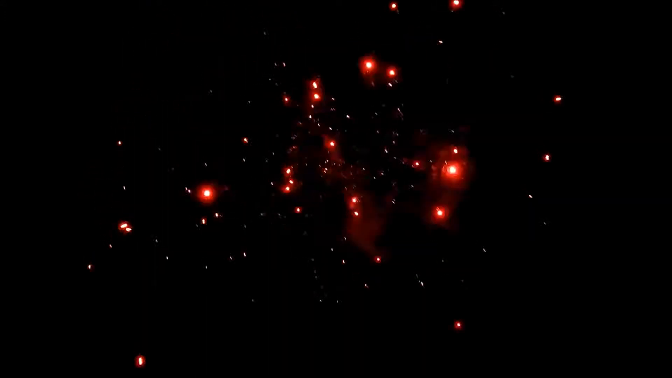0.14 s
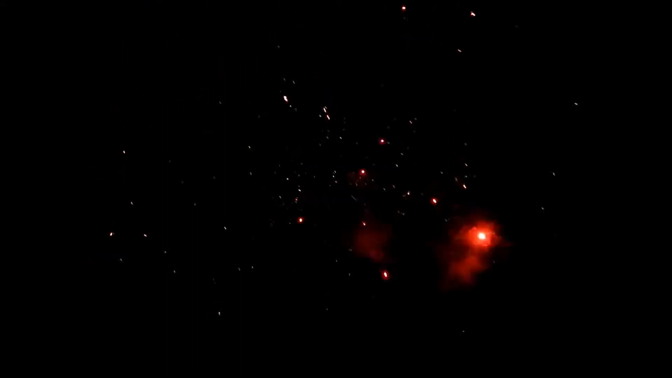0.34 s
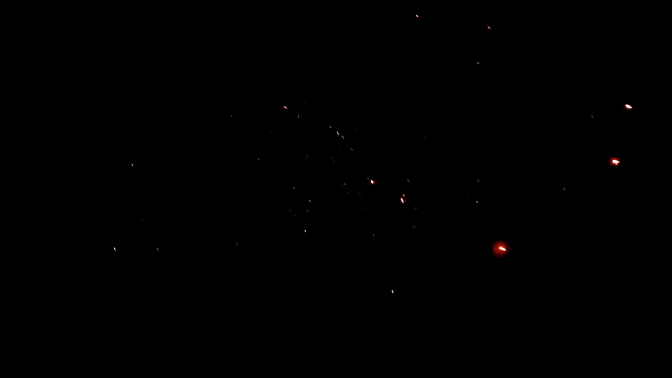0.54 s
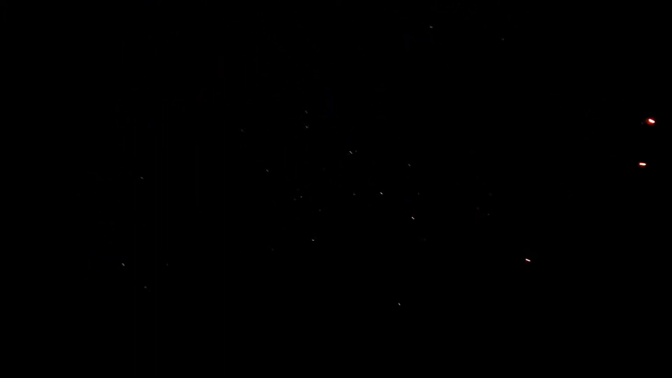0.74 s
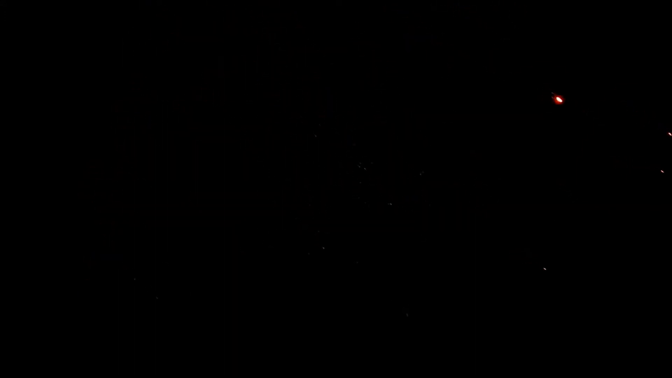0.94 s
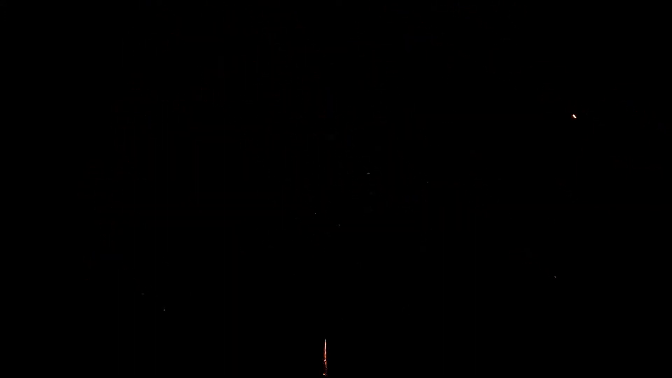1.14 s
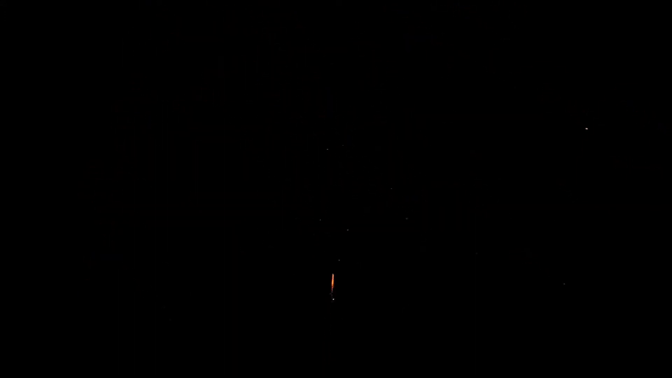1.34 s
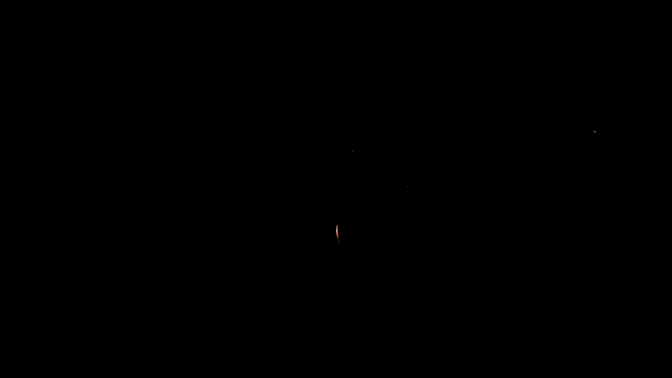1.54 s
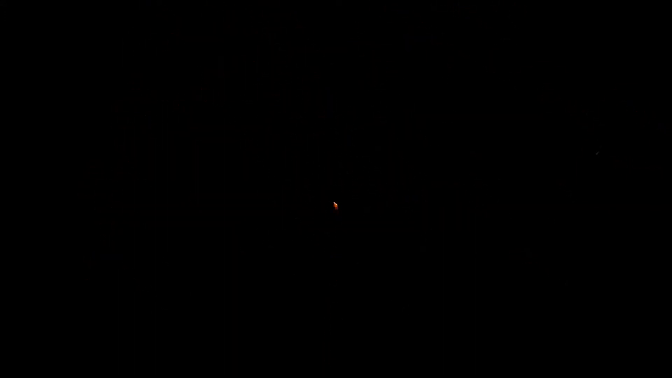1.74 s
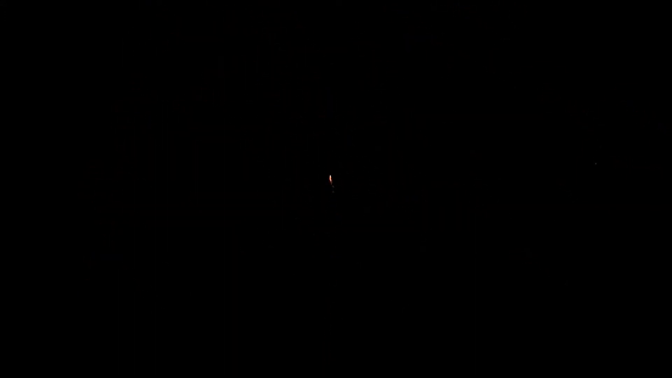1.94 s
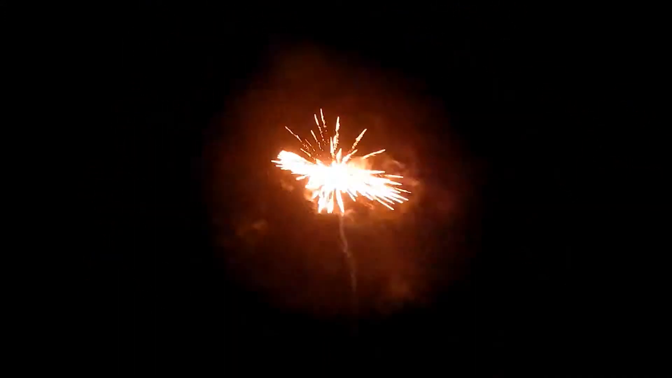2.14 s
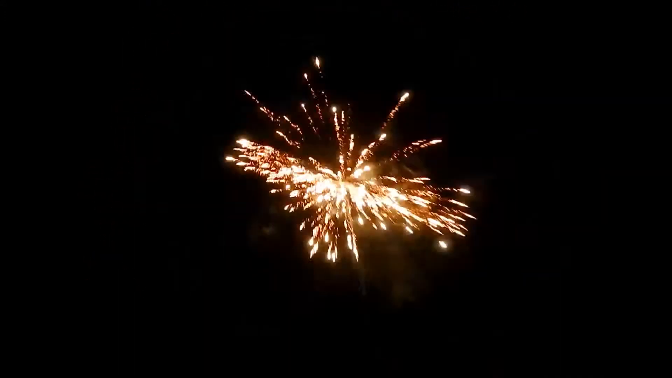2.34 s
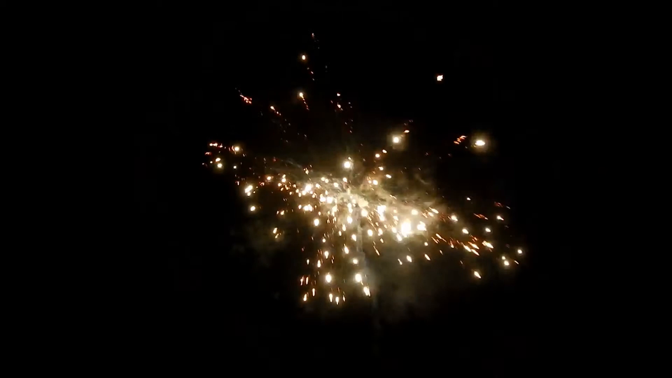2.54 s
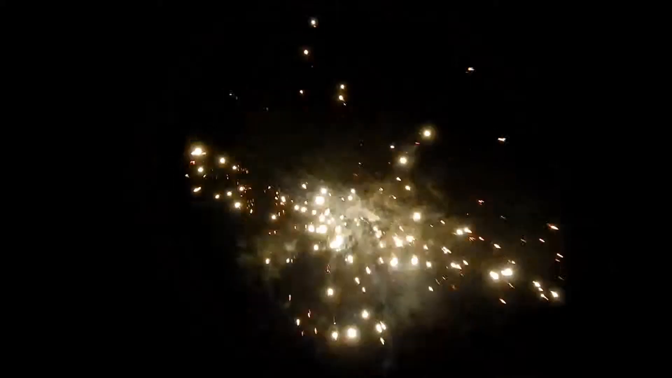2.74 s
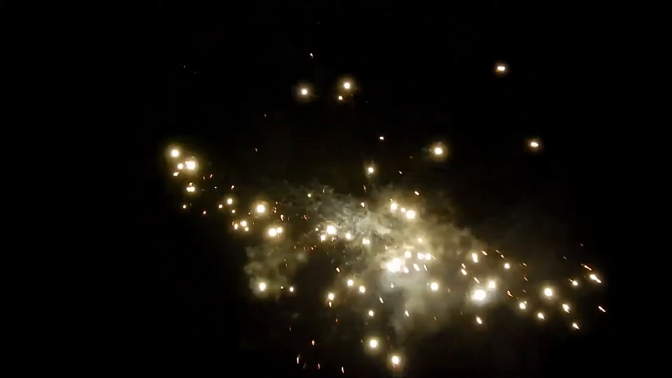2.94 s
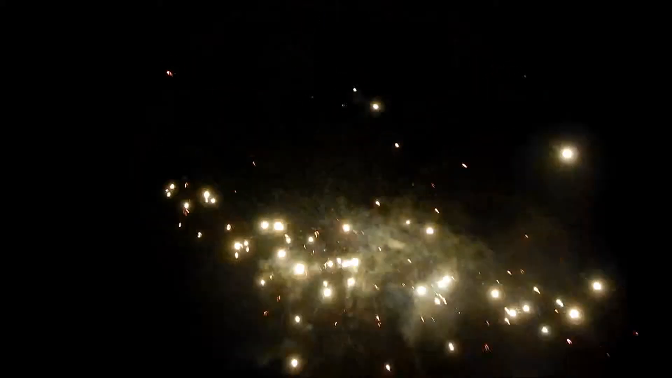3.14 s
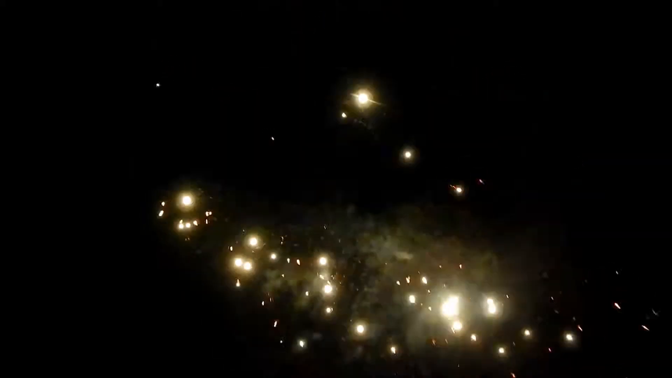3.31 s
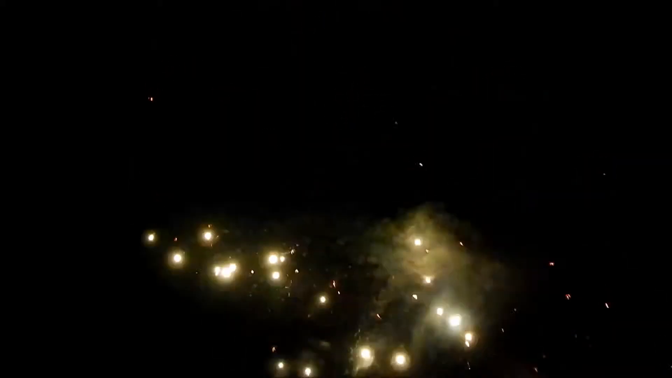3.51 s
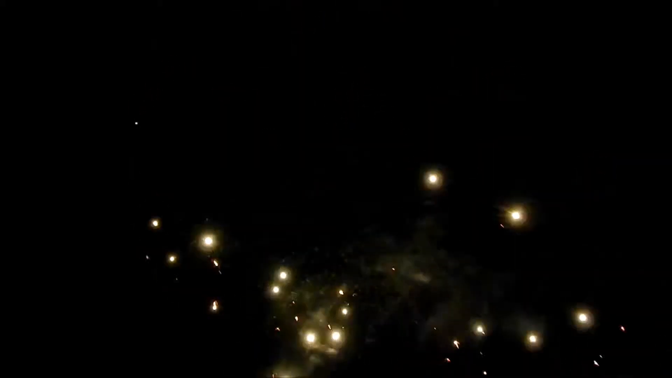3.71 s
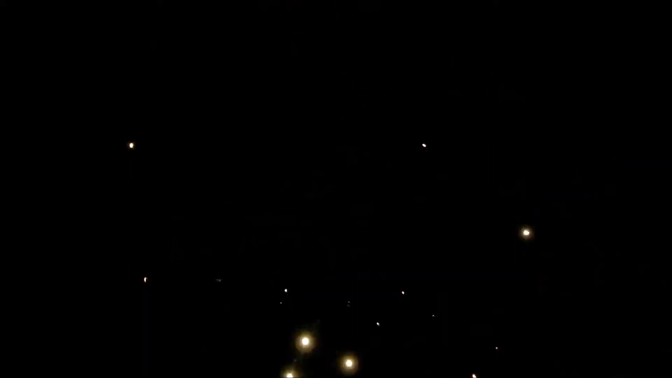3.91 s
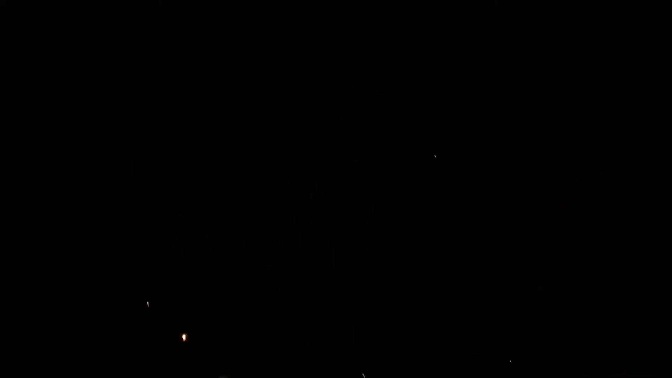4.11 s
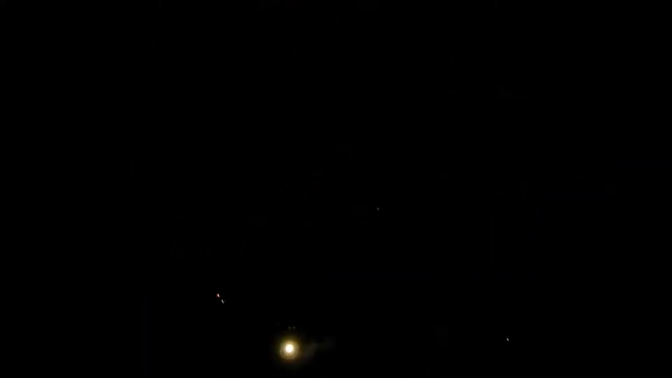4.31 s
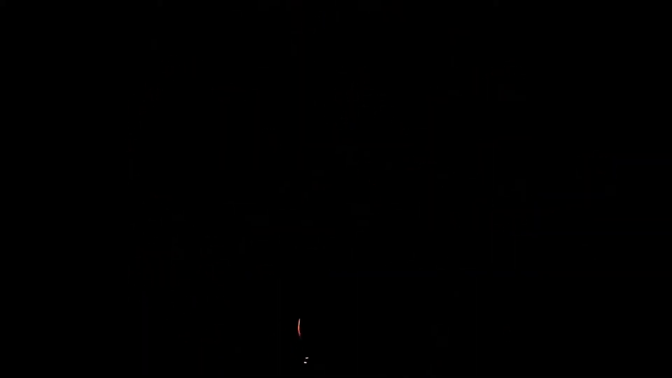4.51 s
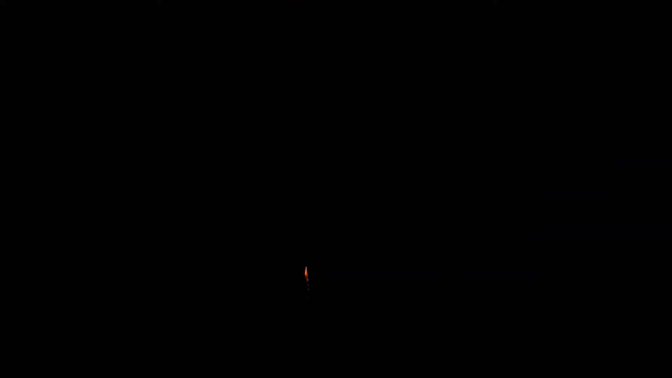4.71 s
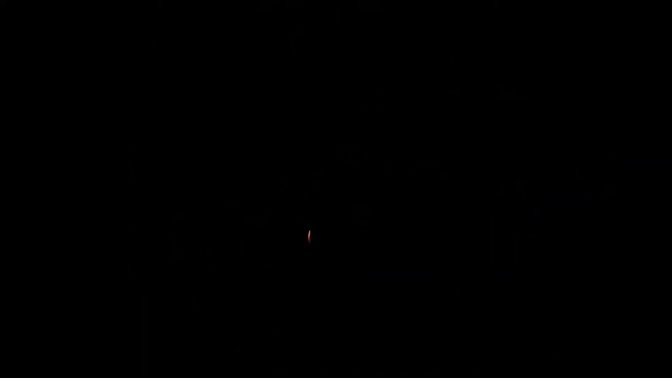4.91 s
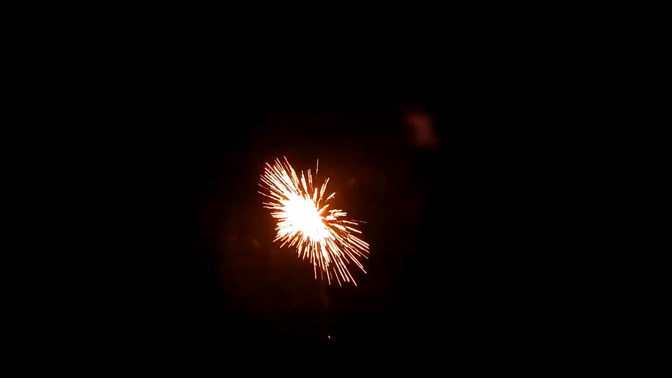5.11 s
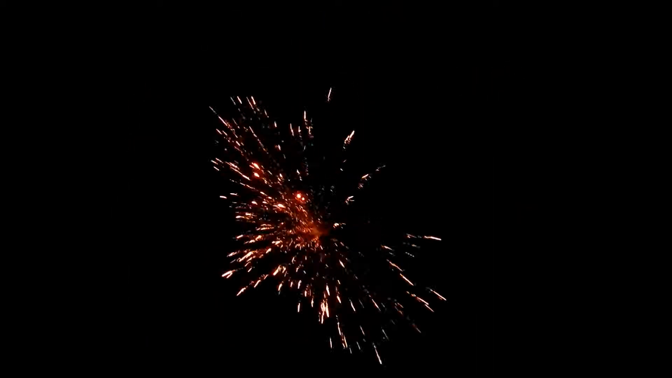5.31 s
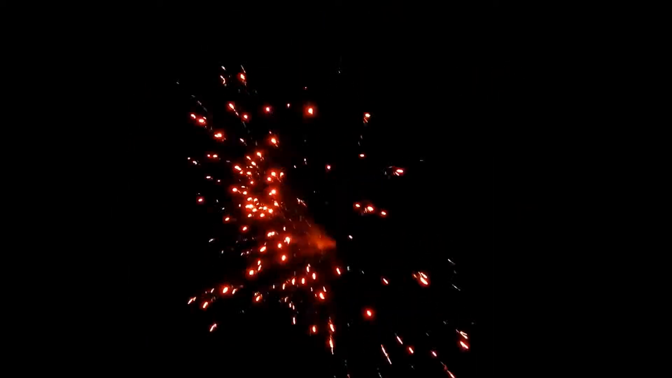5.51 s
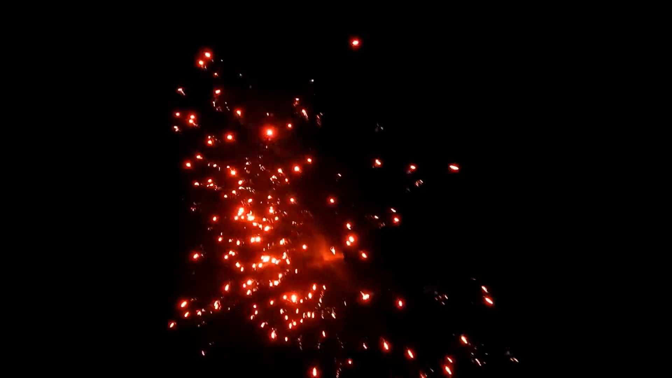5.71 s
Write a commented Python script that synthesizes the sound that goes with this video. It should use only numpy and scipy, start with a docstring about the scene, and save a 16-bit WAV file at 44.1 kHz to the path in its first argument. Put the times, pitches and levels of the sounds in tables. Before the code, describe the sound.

A fireworks battery fires outdoors; near shots and cracking aerial bursts alternate, answered by wall echoes, distant booms and faint hissing.

```python
"""Fireworks battery at night

Two lift charges near the listener and two shell bursts overhead are shock pulses, each answered by
copies from house walls and noise swarms from trees and houses; the bursts also bounce off the ground.
Other bangs roll in from far away as dying tones and noise, over a dull rumble of filtered noise.
A treble hiss of noise is smooth when loud and blotchy when faint. Low noise makes gusts at the
microphones and deep bass of two bangs. Two faint sine whistles and a low noise drone come and go,
and the gain control ducks after each loud bang."""
import sys
import numpy as np
from scipy import signal
from scipy.fft import rfft, irfft
from scipy.io import wavfile
from scipy.ndimage import uniform_filter1d

SR = 44100
rng = np.random.default_rng(int(sys.argv[2]) if len(sys.argv) > 2 else 0)


def unload_wav(signal):
    """Save mono or channel-first audio to the path in sys.argv[1] as 16-bit WAV at rate SR, clipped to [-1, 1]."""
    wavfile.write(
        sys.argv[1],
        SR,
        np.round(np.clip(np.atleast_2d(signal).T, -1, 1) * 32767).astype(np.int16),
    )


def convert_level_to_amplitude(level_db):
    """Map a level in decibels to its linear amplitude factor."""
    exponent = np.asarray(level_db, float) / 20
    return 10 ** exponent


N = 253575
TIME = np.arange(N) / SR

# Likeness of left and right: (frequency [Hz], correlation [1])
LIKENESS = [(60, 0.93), (180, 1), (550, 0.9), (1650, 0.53), (4970, 0.077), (15000, 0.087)]
GUST_LIKENESS = [(1, -.1), (400, -0.075)]
DRONE_LIKENESS = [(1, 1.0), (400, 0.29)]

# Relative noise spectra: (frequency [Hz], density [dB])
FLAT = [(1, 0), (SR, 0)]
RUMBLE_SPECTRUM = [(18, -46.5), (30, -8), (92, -0.5), (190, 0.5), (290, -4), (650, -7), (1400, -14.5),
                   (2400, -31), (4000, -37), (6000, -69)]
HISS_SPECTRUM = [(1500, -32), (3000, 1), (5000, -4), (7500, -10.5), (9500, -4), (11000, -2.5),
                 (13000, -11.5), (15800, -30), (16500, -53)]
GUST_SPECTRUM = [(15, -23.5), (30, -6), (55, 0), (95, -8), (140, -11), (260, -36), (500, -68), (1200, -110)]
ROLL_SPECTRUM = [(35, -20), (60, -15), (92, -7.5), (289, -12), (533, -9), (690, -13), (831, -15),
                 (2210, -47.5), (5000, -67), (6500, -63.5), (11000, -120)]
DRONE_SPECTRUM = [(50, -29.0), (76, -7.5), (90, 7.5), (104, -2.5), (150, -51.5), (400, -100)]

# Courses of rumble, treble hiss and drone: (time [s], level [dB])
RUMBLE_LEVEL = [(0, -55.5), (.2, -54.5), (.35, -48), (.55, -50.5), (1, -53.5), (1.4, -54), (1.8, -47.5),
                (2.2, -40.5), (2.8, -53.5), (3.2, -51), (3.55, -46), (3.75, -47.5), (4.3, -53.5),
                (4.8, -46), (5.2, -37), (5.75, -49)]
HISS_LEVEL = [(0, -71.5), (.48, -65.5), (.7, -74), (1.05, -85), (1.3, -88), (1.75, -73.5), (2.2, -62),
              (2.3, -58), (2.55, -79), (3.2, -90.5), (3.74, -64), (3.9, -71.5), (4.2, -69.5), (4.45, -79),
              (5.05, -65.5), (5.3, -54), (5.5, -71.5), (5.75, -69.5)]
DRONE_LEVEL = [(1.6, -68), (1.85, -50.5), (1.95, -38.5), (2.1, -50.5), (2.17, -39.5), (2.3, -73)]

# Gusts at the microphone ports, and deep bass of the bangs at 1.41 and 2.19 s:
# (peak time [s], level [dB], half length [s], left over right [dB])
GUSTS_AND_BASS = [(0.36, -53.5, 0.04, -1.5), (1.41, -51, 0.087, -2.5), (1.803, -62.5, 0.26, -1.5),
                  (2.19, -43.5, 0.047, 0), (3.7, -67, .4, -3.5), (4.553, -43, .04, 13),
                  (4.786, -26.5, 0.035, 20), (4.85, -31, 0.033, -8), (4.94, -29.5, 0.097, 13),
                  (5.004, -25, 0.026, -16), (5.116, -32, 0.026, 4.5), (5.209, -18, 0.0301, 18),
                  (5.678, -48, 0.096, 2)]

# Lift charges at the tubes:
# (time [s], level [dB], overpressure [ms], lead of first puff [s], puff level [dB])
LIFTS = [(0.5473, -0.5, 1.4, 0.0039, -15.5), (3.752, 2.5, 0.86, 0.0028, -17.5)]
# Shell bursts: (time [s], level [dB], overpressure [ms], ground bounce delay [ms],
# lead of the bounce at the left [ms], extra delay of the walls [ms])
BURSTS = [(2.2173, 5.5, 0.56, 7.95, 0.02, 2), (5.2314, 6.5, 0.65, 7.75, .25, 3)]
# Short rings sent back by stairs or fences:
# (delay [s], frequency [Hz], level re shot [dB], 60 dB decay time [s])
LIFT_RINGS = [(.0618, 1050, -22, .013), (.2655, 1070, -36, .035)]
BURST_RINGS = [(.528, 1150, -50, .06)]
# Flat walls that slap a shot back: (delay [s], level re shot [dB], dull above [Hz])
LIFT_WALLS = [(.0526, -18, 9300), (.1632, -34, 5200)]
BURST_WALLS = [(.016, -34, 2400), (.1315, -36, 3000), (.1735, -29, 8200), (.2592, -36, 4500),
               (.293, -35, 3500), (.4928, -43, 2200), (.7007, -41, 4000), (.758, -41, 4000)]
# Echo swarms from trees and houses:
# (delay [s], level [dB], smear [s], thin below [Hz], dull above [Hz])
LIFT_ECHOES = [(0.0013, -19, 0.004, 260, 6000), (0.009, -11, 0.022, 150, 560),
               (.012, -5, 0.031, 7000, 13000), (0.0063, -16, .05, 1170, 4000),
               (.006, -12, .045, 3000, 7000), (0.064, -21, 0.05, 120, 640), (0.097, -31, 0.022, 450, 3000),
               (.2, -21.5, 0.15, 100, 306), (0.29, -27, 0.055, 900, 2500), (.3, -25, .05, 2200, 4600)]
BURST_ECHOES = [(0.013, -38.5, 0.068, 130, 1900), (0.005, -6, 0.041, 5510, 25000),
                (0.011, -20, 0.084, 917, 2980), (.001, -12, 0.018, 220, 6300),
                (0.0071, -13.5, 0.04, 3000, 7600), (0.194, -34, 0.055, 47, 8700),
                (0.72, -38, 0.015, 860, 4560), (0.27, -21, .055, 700, 4500),
                (0.668, -31.5, 0.047, 550, 3000), (0.726, -30.5, 0.076, 520, 2300)]

# Far bangs: (time [s], knock level [dB], knock frequency [Hz],
# level of each of two roll decays [dB], 60 dB time of the slower decay [s])
FAR_BANGS = [(1.4065, -26, 544, -38, 3.56), (2.0400, -19.5, 485, -26, 0.88), (4.3504, -21.5, 586, -38, 3),
             (4.8445, -23, 596, -28.5, 1.73)]
# Lone dull knocks in the far roll: (time [s], frequency [Hz], level [dB], 60 dB decay time [s])
KNOCKS = [(1.659, 670, -34, .07), (1.809, 620, -34, .06), (3.596, 600, -42, .04), (5.174, 700, -32, .04)]
# Short rushes in the far roll: (time [s], level [dB], smear [s], low edge [Hz], high edge [Hz])
RUSHES = [(5.008, -37, .07, 850, 2200)]


def evened(x):
    """Normalization: scale to an rms of 1."""
    return x / np.sqrt(np.mean(x ** 2) + 1e-20)


def read(points, hz):
    """Logarithmic pitch scale: interpolate a table along log frequency."""
    f, value = np.transpose(points)
    return np.interp(np.log(hz + 1), np.log(f + 1), value)


def curve(points):
    """Envelope: straight lines in decibels, given as amplitude."""
    return convert_level_to_amplitude(np.interp(TIME, *np.transpose(points)))


def add(mix, s, sound):
    """Superposition: add a sound from time s onward, cut at the end of the mix."""
    part = mix[..., round(s * SR):][..., :sound.shape[-1]]
    part += sound[..., :part.shape[-1]]


def dull(x, hz):
    """Treble loss: two-pole low-pass."""
    return signal.sosfilt(signal.butter(2, min(hz, .45 * SR), fs=SR, output="sos"), x)


def band(x, low_hz, high_hz):
    """Band limitation: two poles at each edge."""
    edges = [low_hz, min(high_hz, .45 * SR)]
    return signal.sosfilt(signal.butter(2, edges, "band", fs=SR, output="sos"), x)


def swell(smear, rise=.18):
    """Diffuse arrival: rise over a share of the smear, then a rounded fall."""
    u = TIME[:round(4 * smear * SR)] / smear
    return np.tanh(u / rise) * np.exp(-u ** 1.2)


def noise(spectrum, patchy_db, likeness=LIKENESS, size=(6, 12)):
    """Partly coherent noise: random short-time spectra with patches (size in bins, frames), rms 1."""
    frames = N // 128 + 5
    a, b, c, d, patches = rng.standard_normal((frames, 257, 5)).T
    patches = uniform_filter1d(patches, size=size[0], axis=0)
    patches = evened(uniform_filter1d(patches, size=size[1], axis=1))
    like = np.clip(read(likeness, np.fft.rfftfreq(512, 1 / SR)), -1, 1)[:, None]
    left = a + 1j * b
    right = like * left + np.sqrt(1 - like ** 2) * (c + 1j * d)
    z = np.array([left, right]) * convert_level_to_amplitude(patchy_db * patches)
    x = signal.istft(z, nperseg=512, noverlap=384)[1][:, :N]
    weight = convert_level_to_amplitude(read(spectrum, np.fft.rfftfreq(N, 1 / SR)))
    return evened(irfft(rfft(x) * weight, N))


def far_rumble():
    """Distant blur: dull, patchy noise follows a slow level course."""
    return noise(RUMBLE_SPECTRUM, 3.3) * curve(RUMBLE_LEVEL)


def treble_hiss():
    """Shaped noise: a treble hiss, smooth when loud, blotchy when faint."""
    level = curve(HISS_LEVEL)
    dense = np.clip(level / convert_level_to_amplitude(-64), 0, 1)
    smooth = np.sqrt(dense) * noise(HISS_SPECTRUM, 2)
    blotchy = np.sqrt(1 - dense) * noise(HISS_SPECTRUM, 7, size=(2, 6))
    return level * (smooth + blotchy)


def gusts_and_bass():
    """Low-frequency noise: lumpy gusts and deep bass of two bangs, nearly unrelated left and right."""
    fall_db = 13  # half a length from the peak
    lumps = convert_level_to_amplitude(1.7 * evened(dull(rng.standard_normal((2, N)), 21)))
    level = convert_level_to_amplitude(-77)  # calm floor
    for s, db, half, side_db in GUSTS_AND_BASS:
        weaker_side = np.minimum([[side_db], [-side_db]], 0)
        level = level + convert_level_to_amplitude(db - fall_db * abs(TIME - s) / half + weaker_side)
    return evened(noise(GUST_SPECTRUM, 0, GUST_LIKENESS) * lumps) * level


def far_whistles():
    """Frequency modulation: two sines of wavering strength arch in pitch, highest at their peak."""
    top_hz, peak_s, db = (800, 950), .385, -54
    sag_hz_per_s2, before_db_per_s, after_db_per_s = 1500, 113, 83.5
    t = TIME - peak_s
    cycles = np.outer(top_hz, TIME) - sag_hz_per_s2 * t ** 3 / 3  # integral of the sagging pitch
    waver = 1 + evened(dull(rng.standard_normal((2, N)), 45))
    whistles = (waver * np.sin(2 * np.pi * cycles)).sum(0)
    return whistles * convert_level_to_amplitude(db - np.maximum(-before_db_per_s * t, after_db_per_s * t))


def blast(db, ms, low_hz=110):
    """Blast wave: front, overpressure, suction; the capsule turns the sign, sheds deep bass, rings low."""
    u = np.arange(1500) / SR / (ms / 1000)  # time in overpressure lengths
    shock = dull((1 - u) * np.exp(-.9 * u), 2000) + 0.2 * dull(np.exp(-8 * u), 7000)
    b, a = signal.iirpeak(300, 2.2, SR)
    shock = band(0.98 * shock + 0.55 * signal.lfilter(b, a, shock), low_hz, 18000)
    turbulence = band(rng.standard_normal((2, len(u))), 1800, 12000)  # behind the front
    crack = 0.16 * turbulence * np.exp(-.7 * u)
    return -convert_level_to_amplitude(db) * (shock / shock.max() + crack)


def ring(db, hz, t60):
    """Damped resonance: a short dying tone."""
    t = TIME[:3000]
    return convert_level_to_amplitude(db - 60 * t / t60) * np.sin(2 * np.pi * hz * t) * np.tanh(t / .001)


def slap(db, ms, hz):
    """Reflection: one wall's answer, scattered by ledges and windows."""
    rough = .1 * rng.standard_normal((2, 800)) * np.exp(-TIME[:800] / .005)
    rough[:, 0] = 1  # the mirror reflection
    return dull(signal.fftconvolve(blast(db, ms), rough, axes=1), hz)


def surroundings(echoes):
    """Diffuse scattering: each swarm is a dense run of random reflections that arrive in clumps."""
    swarm, out = noise(FLAT, 2.7, size=(8, 4)), np.zeros((2, SR))
    clumps = evened(band(rng.standard_normal(N), 40, 250))
    swarm = evened(swarm * convert_level_to_amplitude(2.5 * clumps))
    for delay, db, smear, low_hz, high_hz in echoes:
        shape = swell(smear, 0.068 + 0.81 * delay)  # far trees are deep: late swarms rise more slowly
        grains = swarm[:, round(delay * SR):][:, :len(shape)] * shape / np.linalg.norm(shape)
        add(out, delay, convert_level_to_amplitude(db) * dull(band(grains, low_hz, high_hz), 3.2 * high_hz))
    return out


def with_echoes(shots, echoes):
    """Linear response: convolve the shots with their surroundings."""
    return shots + signal.fftconvolve(shots, surroundings(echoes), axes=1)[:, :N]


def lift_charges():
    """Directivity: the tube points away, so a puff and a blunted blast arrive, then rings and slaps."""
    out, lifts = np.zeros((2, 2, N))
    for s, db, ms, earlier, puff_db in LIFTS:
        add(lifts, s, dull(blast(db, ms, low_hz=140), 9000))
        add(out, s - earlier, dull(blast(puff_db, ms), 1600))
        for delay, hz, ring_db, t60 in LIFT_RINGS:
            add(out, s + delay, ring(db + ring_db, hz, t60))
        for delay, wall_db, hz in LIFT_WALLS:
            add(out, s + delay, slap(db + wall_db, .85, hz))
    return out + with_echoes(lifts, LIFT_ECHOES)


def far_bangs():
    """Propagation: distance leaves a ringing knock, a late low thump and a long roll between houses."""
    out, level, t = np.zeros((2, N)), np.zeros(N), TIME[:6000]
    rushes = list(RUSHES)
    for s, db, hz, roll_db, t60 in FAR_BANGS:
        knock = np.sin(2 * np.pi * hz * t)
        knock += .5 * np.sin(2 * np.pi * 0.83 * hz * t)  # unrelated rings beat
        knock += 0.1 * np.sin(2 * np.pi * 1.6 * hz * t)
        add(out, s, -convert_level_to_amplitude(db) * knock * np.exp(-(t / .011) ** 2) * np.tanh(t / .0008))
        thump = np.sin(2 * np.pi * 180 * t) * np.exp(-((t - .02) / .009) ** 2)
        add(out, s + .014, convert_level_to_amplitude(roll_db + 4) * thump)
        decay = convert_level_to_amplitude(roll_db - 60 * TIME / t60) + convert_level_to_amplitude(roll_db - 60 * TIME / 0.27)
        add(level, s, decay * np.tanh(TIME / 0.0047))
        rushes.append((s, db - 21, .024, 700, 2100))  # noisy front of the bang
    for s, hz, db, t60 in KNOCKS:
        add(out, s, ring(db, hz, t60))
    white = noise(FLAT, 2, size=(8, 4))
    for s, db, smear, low_hz, high_hz in rushes:
        shape = swell(smear)
        rush = white[:, round(s * SR):][:, :len(shape)]
        rush = evened(band(band(rush, low_hz, high_hz), low_hz, high_hz))
        add(out, s, convert_level_to_amplitude(db) * shape * rush)
    flutter = convert_level_to_amplitude(0.72 * evened(band(rng.standard_normal(N), 8.4, 50)))  # echoes arrive in clumps
    return out + level * flutter * noise(ROLL_SPECTRUM, 2)


def low_drone():
    """Narrow-band noise: a band near 90 Hz is heard as a wavering low tone."""
    return noise(DRONE_SPECTRUM, 0, DRONE_LIKENESS) * curve(DRONE_LEVEL)


def shell_bursts():
    """Image source: each overhead blast is followed by its ground bounce, then rings and wall slaps."""
    out, bursts = np.zeros((2, 2, N))
    for s, db, ms, bounce_ms, lead_ms, later_ms in BURSTS:
        add(bursts, s, blast(db, ms, low_hz=78.5))
        bounce = dull(blast(db - 4, 1.1 * ms), 12000)
        add(out[0], s + bounce_ms / 1000, bounce[0])
        add(out[1], s + (bounce_ms + lead_ms) / 1000, bounce[1])
        for delay, hz, ring_db, t60 in BURST_RINGS:
            add(out, s + delay, ring(db + ring_db, hz, t60))
        for delay, wall_db, hz in BURST_WALLS:
            add(out, s + delay + later_ms / 1000, slap(db + wall_db, .36, hz))
    return out + with_echoes(bursts, BURST_ECHOES)


def scene():
    """Superposition: the sound pressures of all sources add."""
    near = lift_charges() + shell_bursts()
    far = far_rumble() + far_whistles() + far_bangs() + low_drone()
    return near + far + treble_hiss() + gusts_and_bass()


def top_cut(x):
    """Nothing passes above the cut-off."""
    return signal.sosfilt(signal.butter(12, 16650, fs=SR, output="sos"), x)


def record(dry):
    """Compression: the gain falls within a tenth of a second after a bang and recovers slowly."""
    power = uniform_filter1d((dry ** 2).mean(0), size=400)
    power_db = 10 * np.log10(abs(power) + 1e-12)
    fall = TIME * 6.5  # the held level sinks by 6.5 dB a second
    held_db = np.maximum.accumulate(power_db + fall) - fall
    over_db = np.maximum(held_db + 26.5, 0)
    r = np.exp(-1 / (0.078 * SR))  # smoothing over 78 ms
    ducked = dry / convert_level_to_amplitude(0.44 * signal.lfilter([1 - r], [1, -r], over_db))
    overloaded = np.clip(ducked, -.93, .93)
    finished = dull(overloaded, 15000)  # treble roll-off of the input stage
    return top_cut(finished)


dry = scene()
out = record(dry)
unload_wav(out)
```